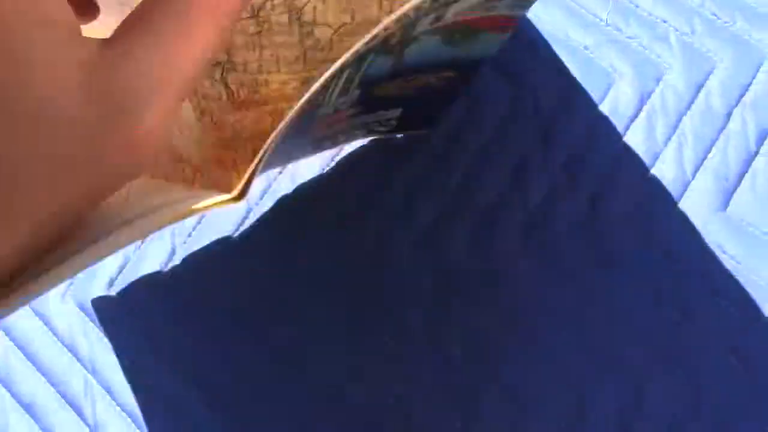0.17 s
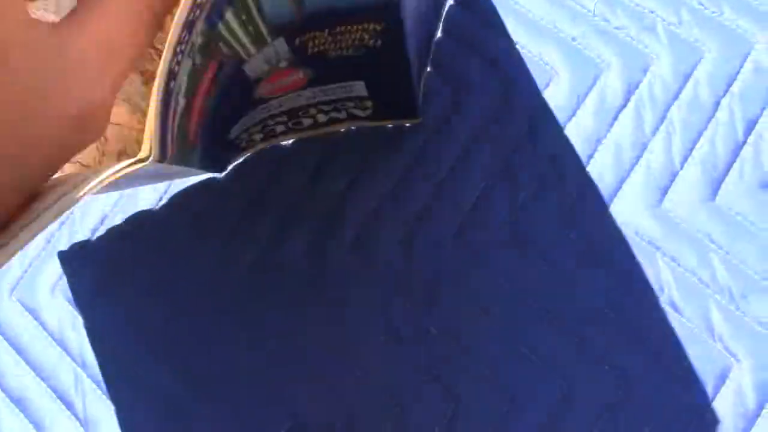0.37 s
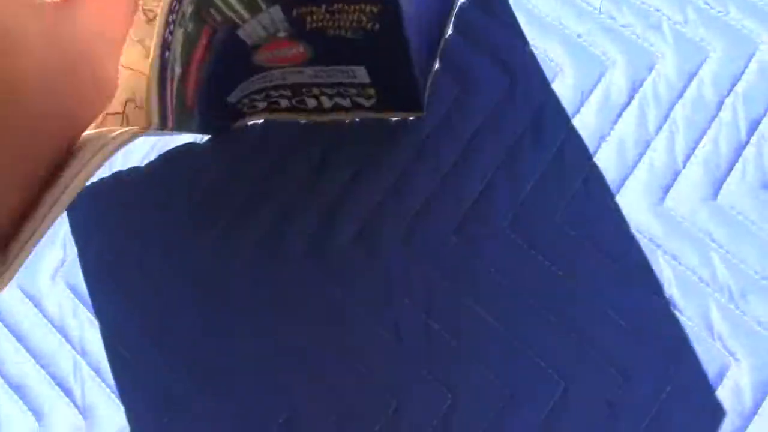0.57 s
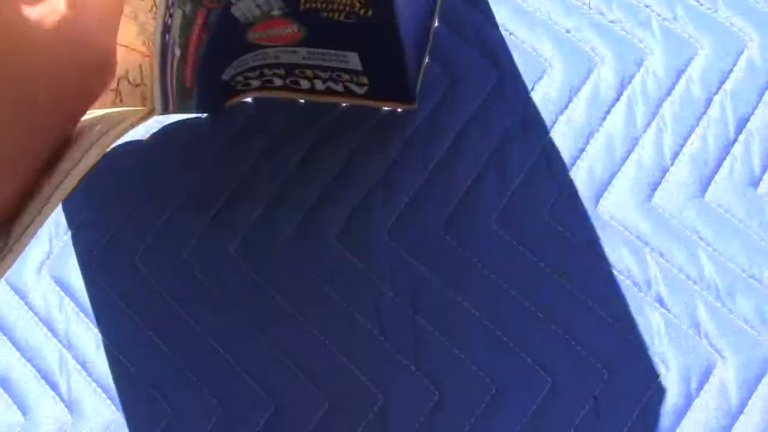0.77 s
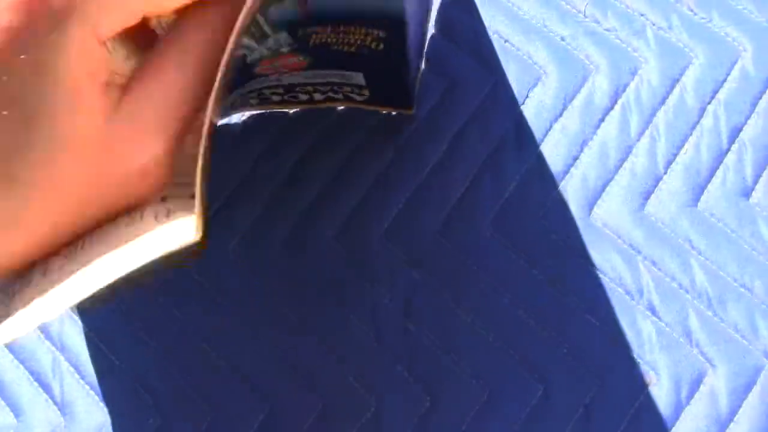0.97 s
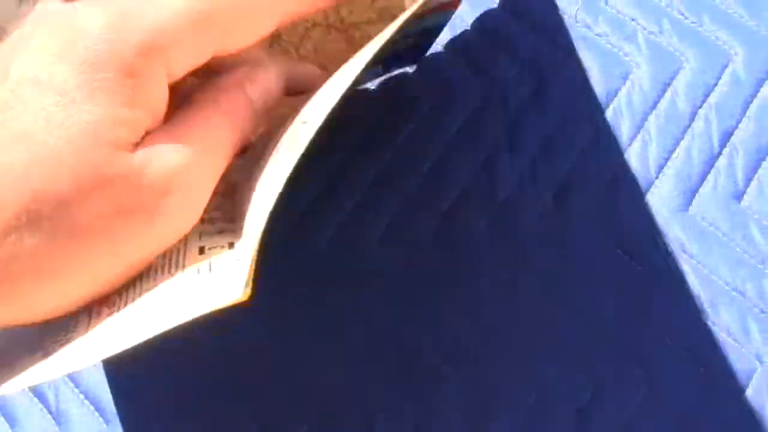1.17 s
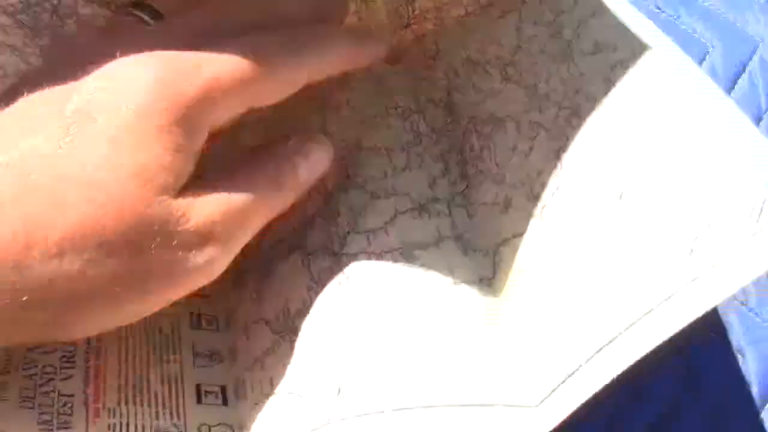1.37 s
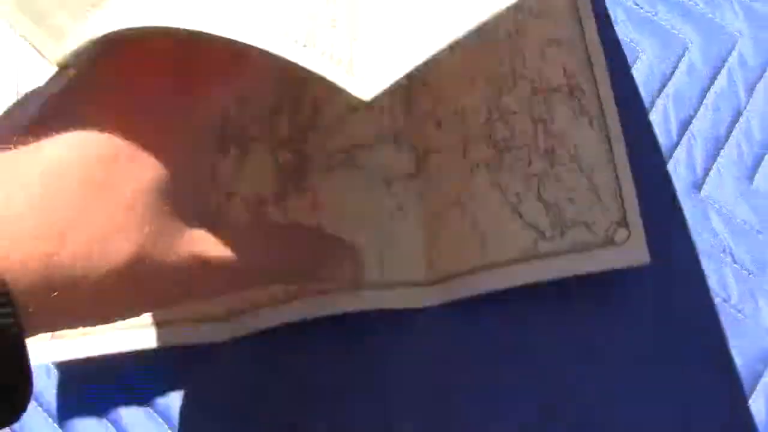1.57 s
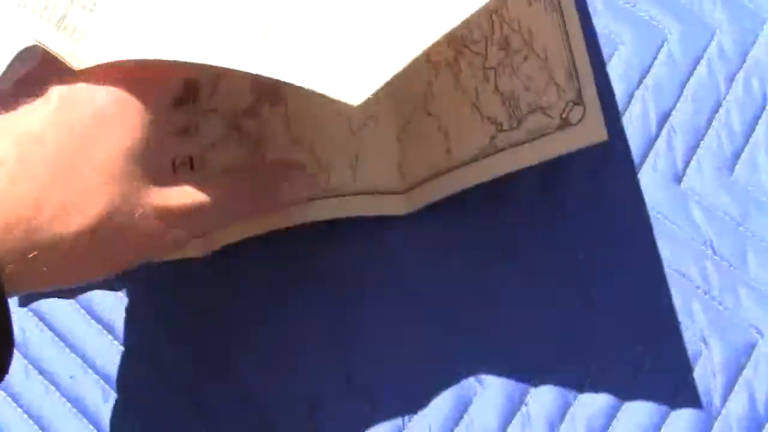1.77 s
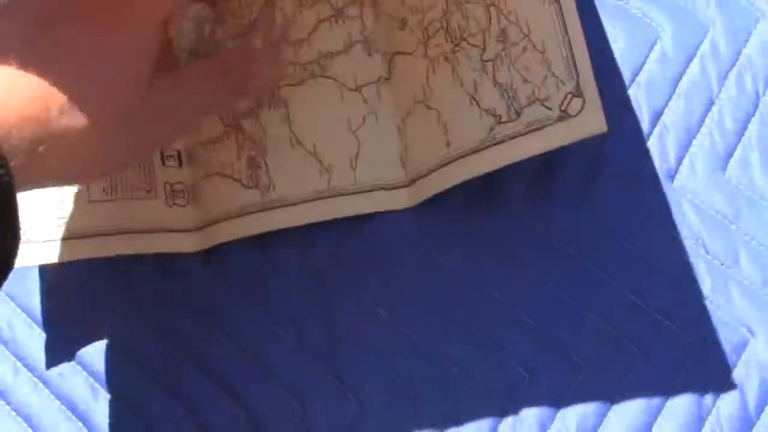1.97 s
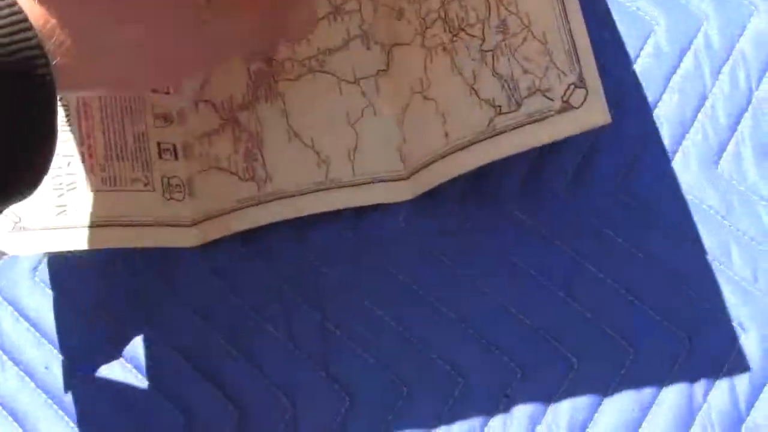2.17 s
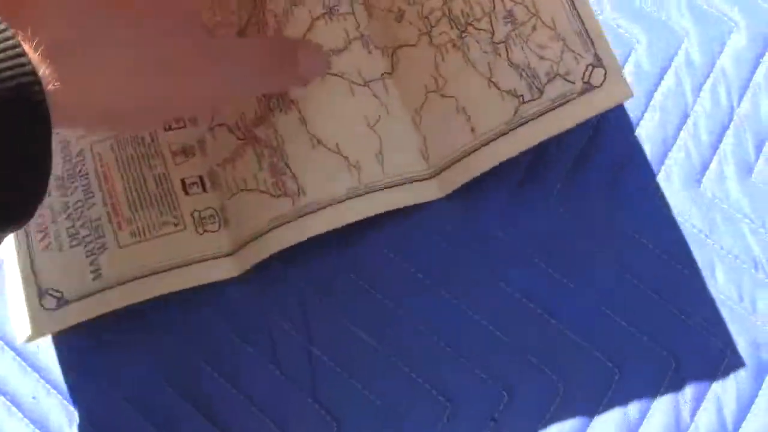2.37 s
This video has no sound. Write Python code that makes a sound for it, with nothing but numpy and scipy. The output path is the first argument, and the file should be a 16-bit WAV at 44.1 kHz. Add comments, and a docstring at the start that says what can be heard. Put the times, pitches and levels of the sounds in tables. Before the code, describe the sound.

Stiff paper map unfolding with swishes, soft flops and crisp snaps, in light wind.

```python
"""A brush of paper, a soft flop, then crisp snaps: an old folded map is opened by hand, close up, outdoors.
Its creases buckle in short runs of clicks that ring the stiff sheet, and its panels flop, scrape and
slide over each other. Underneath, a light wind rumbles on the microphone over a faint outdoor hiss
and the ticking of the camera's motor."""
import sys
import numpy as np
from scipy import signal
from scipy.fft import rfft, irfft, next_fast_len
from scipy.io import wavfile
from scipy.ndimage import map_coordinates

SR = 44100
rng = np.random.default_rng(int(sys.argv[2]) if len(sys.argv) > 2 else 0)


def int16_out(signal):
    """Quantize to a 16-bit WAV file."""
    q = np.round(np.clip(np.atleast_2d(signal).T, -1, 1) * 32767)
    wavfile.write(sys.argv[1], SR, q.astype(np.int16))


N = 106413


def amp(db):
    """Decibels to gain."""
    return 10 ** (np.asarray(db) / 20)


def unit(x):
    """Scale to rms 1."""
    return x / np.sqrt(np.mean(x ** 2) + 1e-20)


def hit(x, seconds=0.01):
    """Give a transient the energy of that many seconds at rms 1."""
    return x * np.sqrt(seconds * SR / (np.sum(x ** 2) + 1e-20))


def decay(t, t60):
    """An envelope that falls 60 dB in t60 seconds."""
    return amp(-60 * t / t60)


def along(points, hz):
    """Read a curve of (f/Hz, value) points on a log frequency axis."""
    freqs, values = np.transpose(points)
    return np.interp(np.log(hz + 1), np.log(freqs + 1), values)


def filtered(x, response):
    """Pass x through a complex frequency response."""
    n = x.shape[-1]
    padded = next_fast_len(n + SR // 10)
    return irfft(rfft(x, padded) * response(np.fft.rfftfreq(padded, 1 / SR)), padded)[..., :n]


def equalize(x, curve):
    """Shape x with an EQ curve of (f/Hz, level/dB) points."""
    return filtered(x, lambda hz: amp(along(curve, hz)))


def resonate(x, hz, q):
    """A broad band-pass resonance."""
    return filtered(x, lambda f: 1j * f * hz / q / (hz * hz - f * f + 1j * f * hz / q))


def soften(x, hz):
    """A gentle low-pass, 12 dB per octave."""
    return filtered(x, lambda f: hz * hz / (hz * hz - f * f + 1j * np.sqrt(2) * f * hz))


def muffle(x, hz):
    """A steep low-pass, 24 dB per octave."""
    return signal.sosfilt(signal.butter(4, min(hz, SR / 2 - 1), fs=SR, output="sos"), x)


def add(track, start, x):
    """Mix x into the track at start seconds."""
    part = track[max(round(start * SR), 0):][:len(x)]
    part += x[:len(part)]


def wobble(per_s):
    """A smooth random curve through per_s points a second."""
    points = rng.standard_normal(int(N * per_s / SR) + 4)
    return map_coordinates(points, [np.arange(N) * per_s / SR])


def stereo_noise(spectrum, correlation):
    """A noise bed of rms 1 that widens where left and right are less correlated."""
    def mid_side_gains(hz):
        width = np.arccos(np.clip(along(correlation, hz), -1, 1)) / 2
        return amp(along(spectrum, hz)) * [np.cos(width), np.sin(width)]
    mid, side = filtered(rng.standard_normal((2, N)), mid_side_gains)
    return unit(np.array([mid + side, mid - side]))


# Tone of the outdoor bed: f/Hz, level/dB
OUTDOOR_TONE = [(30, -15), (200, -1), (500, 3.5), (1000, -1), (2500, -10), (6000, -12.5), (10000, -15.5),
                (13000, -19.5)]
# Its stereo image: f/Hz, left-right correlation
OUTDOOR_IMAGE = [(200, 0.91), (4000, 1), (11000, 1), (12500, 0.49)]
def outdoor_hiss(level_db=-41):
    """Open air: a faint, steady, nearly centred bed."""
    return amp(level_db) * stereo_noise(OUTDOOR_TONE, OUTDOOR_IMAGE)


# The motor's limping rhythm, looped: gap between ticks/clock steps
TICK_RHYTHM = [2, 2, 2, 3]
def camera_motor(clock_hz=60, tick_hz=1768, level_db=-39.5, width_s=0.0015, offset_s=0.015):
    """A small motor ticks faintly and shakes the two microphone ports in opposite directions."""
    out, t = np.zeros(N), np.arange(SR // 50) / SR
    tick = np.sin(2 * np.pi * tick_hz * t) * np.exp(-0.5 * ((t - t.mean()) / width_s) ** 2)
    steps = np.cumsum(np.resize(TICK_RHYTHM, N // (SR // 30)))
    levels_db = rng.normal(level_db, 0.88, len(steps))
    for centre, db in zip(offset_s + steps / clock_hz, levels_db):
        add(out, centre - t.mean(), amp(db) * tick)
    return np.array([out, -out])


# Tone of the wind's rumble: f/Hz, level/dB
RUMBLE_TONE = [(20, -46), (40, -10.5), (68, -1.5), (110, -2.5), (160, -1), (250, -10), (450, -18),
               (1200, -43.5)]
# Its narrow image: f/Hz, left-right correlation
RUMBLE_IMAGE = [(60, 0.83), (160, 0.87), (400, 1)]
# Tone of a gust: f/Hz, level/dB
GUST_TONE = [(25, -20), (70, 1.5), (110, 3), (165, 2.5), (240, -5.5), (400, -14.5), (1500, -67)]
# Its image, wide above the deep bass: f/Hz, left-right correlation
GUST_IMAGE = [(50, 1), (130, 0.042)]
# Gusts on the microphone: centre t/s, width/s, level/dB
GUST_CUES = [(0.451, 0.014, -29), (.55, 0.024, -37.5), (.64, 0.032, -33.5), (0.848, 0.013, -28),
             (0.926, 0.047, -36), (1.16, 0.024, -25), (1.235, 0.026, -25.5), (1.419, 0.017, -31),
             (2.381, 0.017, -28.5)]
def wind(rumble_db=-36.5, buffet_db=1, pan_db=0.4):
    """Wind rumbles low on the microphone, and gusts buffet each port on its own."""
    t = np.arange(N) / SR
    power = sum(amp(db) ** 2 * np.exp(-0.5 * ((t - centre) / width) ** 2)
                for centre, width, db in GUST_CUES)
    gusts = np.sqrt(power) * stereo_noise(GUST_TONE, GUST_IMAGE) * amp([[pan_db], [-pan_db]])
    rumble = amp(rumble_db + buffet_db * wobble(per_s=11.93)) * stereo_noise(RUMBLE_TONE, RUMBLE_IMAGE)
    return gusts + rumble


def friction(catches_per_s, rub, spread_db=2.5):
    """Paper fibres catch: tiny clicks of uneven size over a smooth rub."""
    sizes = amp(spread_db * np.minimum(rng.exponential(size=N), 4))
    clicks = (rng.random(N) < catches_per_s / SR) * sizes * rng.choice([-1, 1], N)
    return unit(unit(clicks) + rub * rng.standard_normal(N))


# Bright layer of a slide: f/Hz, level/dB
HISS_TONE = [(300, -14), (1500, 0), (3500, 2.5), (6200, 2), (10000, -4), (13000, -7.5)]
# Dark layer of a slide: f/Hz, level/dB
RUSTLE_TONE = [(100, -28), (250, 5.5), (600, -0.5), (1200, 0), (2200, -3), (3500, -14), (6000, -16),
               (13000, -37)]
# Panels sliding on each other: t/s, length/s, hiss level/dB, rustle level/dB
SLIDE_CUES = [(0, 0.13, -47.5, -45), (0.162, 0.068, -36.5, -45.5), (0.224, 0.054, -40.5, -38.5),
              (0.273, 0.061, -36.5, -38), (0.336, 0.11, -40.5, -46.5), (0.596, 0.11, -44.5, -43),
              (0.768, 0.07, -44.5, -41), (0.975, 0.05, -42, -51), (1.023, 0.19, -41, -40),
              (1.216, 0.11, -40.5, -33), (1.294, 0.12, -51, -40.5), (1.41, 0.083, -38.5, -39.5),
              (1.468, 0.11, -41, -33), (1.588, 0.082, -40, -36), (1.669, 0.14, -38, -40),
              (1.806, 0.2, -50.5, -44.5), (2.015, 0.11, -62, -39.5), (2.093, 0.11, -43.5, -38),
              (2.189, 0.13, -46, -48), (2.298, 0.091, -41.5, -37.5), (2.35, 0.099, -68.5, -36.5)]
def slides(attack_s=0.019, release_s=0.034, crinkle_hz=1710, crinkle_db=-9):
    """Each stroke of paper on paper gives a smooth hiss and a grainy rustle with stray crinkles."""
    t = np.arange(N) / SR
    hiss_power, rustle_power = np.zeros((2, N))
    for start, length, hiss_db, rustle_db in SLIDE_CUES:
        stroke = np.clip(np.minimum((t - start) / attack_s, (start + length - t) / release_s), 0, 1)
        hiss_power += stroke * amp(hiss_db) ** 2
        rustle_power += stroke * amp(rustle_db) ** 2
    hiss = unit(equalize(friction(catches_per_s=2000, rub=1), HISS_TONE))
    rustle = unit(equalize(friction(catches_per_s=2000, rub=0.52), RUSTLE_TONE))
    crinkles = resonate(friction(catches_per_s=170, rub=0), crinkle_hz, q=0.5)
    rustle += amp(crinkle_db) * unit(soften(crinkles, 2 * crinkle_hz))
    grip = wobble(per_s=64)  # unsteady grip makes both layers flutter together
    hiss *= np.sqrt(hiss_power) * amp(2.1 * grip)
    rustle *= np.sqrt(rustle_power) * amp(2.76 * grip)
    return hiss + rustle


# Edges scraping across a panel: t/s, length/s, level/dB, f/Hz
SCRAPE_CUES = [(1.094, 0.0094, -17.5, 1570), (1.106, 0.014, -32, 1400), (1.287, 0.026, -33.5, 1910),
               (1.321, 0.0237, -25, 1310), (1.492, 0.02, -27.5, 1820), (1.604, 0.03, -23.5, 1790),
               (1.943, 0.0562, -33, 1390), (2.285, 0.0176, -32.5, 1820), (2.333, 0.038, -22.5, 1600),
               (2.346, 0.016, -24.5, 1820)]
def scrapes(swell_share=0.843):
    """An edge drags over a panel; the catching swells for most of the stroke, then lets go."""
    out, t = np.zeros(N), np.arange(N) / SR
    for start, length, db, hz in SCRAPE_CUES:
        stroke = np.interp((t - start) / length, [0, swell_share, 1], [0, 1, 0]) ** 0.506
        rasp = resonate(friction(catches_per_s=1800, rub=0.11), hz, q=1)
        out += amp(db) * stroke * unit(soften(rasp, 1.23 * hz))
    return out


# Panels flopping over: t/s, level/dB, f/Hz, t60/s
FLOP_CUES = [(0.0715, -26.5, 272, 0.044), (.305, -25.5, 283, 0.05), (0.405, -26, 455, 0.056),
             (1.009, -30, 240, 0.025), (1.1045, -19, 262, 0.05), (1.127, -23.5, 104, 0.22),
             (1.212, -24.5, 310, 0.046), (1.5606, -24, 272, 0.023), (1.569, -21.5, 329, 0.044),
             (2.202, -22, 354, 0.01), (2.348, -25, 307, 0.075)]
def flops(attack_s=0.0008, sag_share=0.12, sag_s=0.016, roughness=0.6):
    """A panel pops over and pushes the air: a few low, uneven cycles that sag in pitch."""
    out, t = np.zeros(N), np.arange(SR // 10) / SR
    for start, db, hz, t60 in FLOP_CUES:
        pitch = hz * (1 + sag_share * (np.exp(-t / sag_s) - 0.5))
        flutter = unit(soften(resonate(rng.standard_normal(len(t)), hz, q=1), 2 * hz))
        swing = np.sin(2 * np.pi * np.cumsum(pitch) / SR) + roughness * flutter
        envelope = (1 - np.exp(-t / attack_s)) * decay(t, t60)
        add(out, start, amp(db) * hit(swing * envelope))
    return out


# Hollow ring of the stiff panel: f/Hz, level/dB
PANEL_MODES = [(1020, -3), (1830, -0.5), (2830, 1.5), (4240, 4)]
def snap_tail(t, shiver_db=-9.5, modes_db=-12.5, echo_db=-21, detune_share=0.018):
    """The sheet shivers and rings, its modes detuned by bending; the surroundings echo faintly."""
    shiver, echo = rng.standard_normal((2, len(t)))
    shiver = soften(shiver * decay(t, t60=0.026), hz=4550)  # paper damps the highs
    echo *= decay(t, t60=0.058)
    bends = 1 + detune_share * rng.standard_normal(len(PANEL_MODES))
    modes = sum(amp(db) * np.sin(2 * np.pi * hz * bend * t) for (hz, db), bend in zip(PANEL_MODES, bends))
    modes *= decay(t, t60=0.037)
    return amp(shiver_db) * hit(shiver) + amp(modes_db) * hit(modes) + amp(echo_db) * hit(echo)


def disperse(x, bass_lag_s=0.000622, corner_hz=4950):
    """Bending waves in the sheet carry the treble faster than the bass."""
    return filtered(x, lambda hz: np.exp(-2j * np.pi * bass_lag_s * corner_hz
                                         * (1 - np.exp(-hz / corner_hz))))


# Creases buckling: t/s, level/dB, f/Hz, run length/s, treble edge/dB, panel body/dB
# Edge and body are relative to the snap's main band.
SNAP_CUES = [(.0995, -36.5, 1370, 0.004, -16, 0), (0.144, -29, 1800, 0.0033, -14, -5.5),
             (0.165, -20.5, 1120, 0.0032, -22, -4), (0.168, -26, 2440, 0.0019, -21, -16),
             (.232, -27, 1610, 0.0035, -6, -13), (0.3037, -42, 3020, 0.0022, 9, 2),
             (0.401, -29, 1450, 0.00383, -16, -2.5), (0.4043, -29.5, 3180, .003, -20, -8),
             (0.8235, -38, 1900, 0.0013, 1, -8), (1.0974, -22, 1450, 0.003, -24, -20),
             (1.1067, -27, 1480, 0.00042, -32, -9), (1.2523, -19, 1950, 0.0017, -2.5, -6),
             (1.2552, -21, 2950, 0.0021, 0, -4), (1.304, -26.5, 2680, 0.0031, -35.5, -3),
             (1.3225, -27, 1100, 0.00165, -28, 2), (1.5398, -27.5, 2210, 0.0028, -17, -9),
             (1.5605, -36, 1990, 0.0007, -23.5, 2), (1.5699, -14.5, 3050, .0004, -7.5, -10),
             (1.8114, -33, 2110, 0.00093, -18.5, -6.5), (1.9405, -26, 1650, 0.0016, -12, -1.5),
             (1.9661, -19, 850, 0.0047, -31, -1.5), (2.0451, -37.5, 1500, 0.0037, -5.5, 1),
             (2.1049, -31, 1115, 0.0018, -16, -3), (2.1718, -24.5, 2450, 0.0011, -8.5, -10),
             (2.2024, -25.5, 670, 0.00054, -31, -9), (2.381, -33, 1500, 0.0034, -32.5, -1),
             (2.392, -20, 1280, 0.0003, -54, -14)]
def creases(slips=4, slip_size=0.43, full_run_s=0.0036, edge_hz=5400, body_hz=558):
    """A crease gives way with a click, small slips and a last click; longer runs ring the sheet more."""
    out, t = np.zeros(N), np.arange(SR // 10) / SR
    for start, db, hz, run_s, edge_db, body_db in SNAP_CUES:
        reach = min(run_s / full_run_s, 1)  # at 1 the whole sheet rings
        clicks = np.zeros(len(t))
        clicks[0] = 1
        clicks[int(run_s * SR)] += reach
        slip_sizes = slip_size * rng.standard_normal(slips)
        clicks[(rng.random(slips) * run_s * SR).astype(int)] += slip_sizes
        force = hit(clicks) + np.sqrt(reach) * snap_tail(t)
        snap = hit(muffle(resonate(force, hz, q=1.1), 1.72 * hz))
        treble = resonate(force, edge_hz, q=0.61)
        edge = hit(soften(resonate(treble, edge_hz, q=0.75), edge_hz))
        body = hit(muffle(resonate(force, body_hz, q=0.42), 3 * body_hz))
        add(out, start, amp(db) * (snap - amp(edge_db) * edge - amp(body_db) * body))
    return out


def scene():
    """The map sits dead centre, in open air."""
    paper = disperse(creases()) + scrapes() + flops() + slides()
    return paper + wind() + camera_motor() + outdoor_hiss()


# Colour of the microphone: f/Hz, level/dB
MIC_EQ = [(900, -0.5), (1350, -3.5), (1830, 2), (2400, -0.5), (7000, 0.5), (8400, -2), (9800, 1.5),
          (12500, -3)]
def record(dry, ceiling=0.95, knee=6, top_hz=12900):
    """Microphone colour, a soft limit that rounds off the loudest snaps, then a brick-wall low-pass."""
    coloured = equalize(dry, MIC_EQ)
    rounded = coloured / (1 + np.abs(coloured / ceiling) ** knee) ** (1 / knee)
    return filtered(rounded, lambda hz: 1 / np.sqrt(1 + (hz / top_hz) ** 200))


dry = scene()
out = record(dry)
int16_out(out)
```